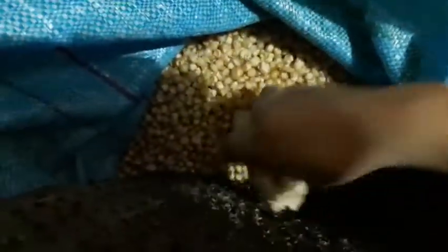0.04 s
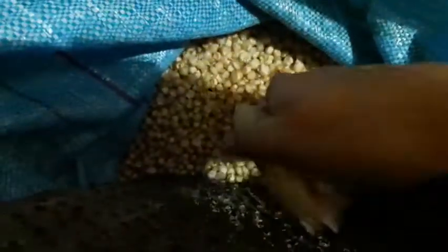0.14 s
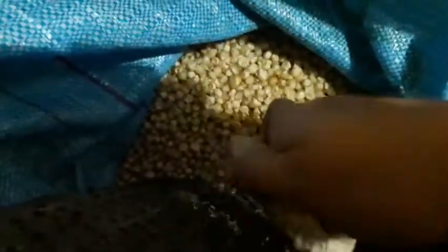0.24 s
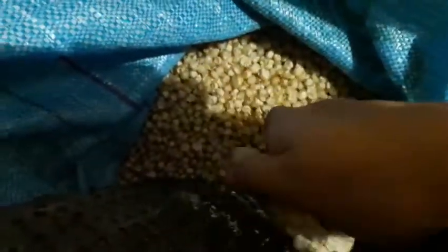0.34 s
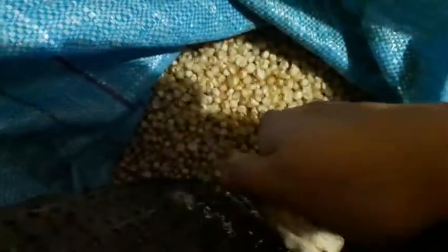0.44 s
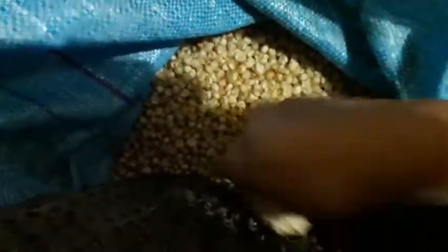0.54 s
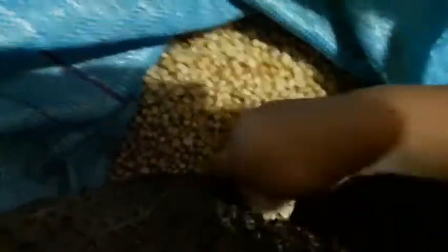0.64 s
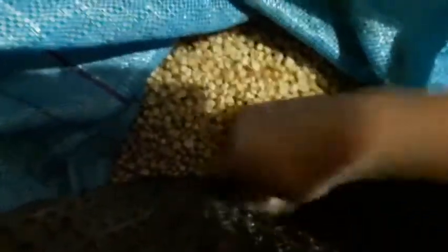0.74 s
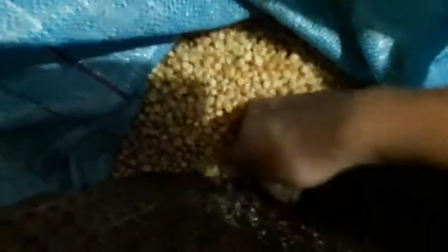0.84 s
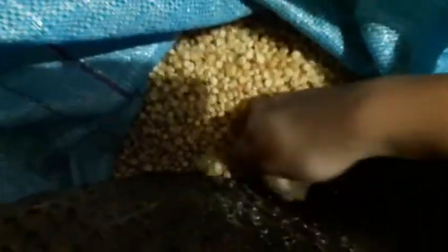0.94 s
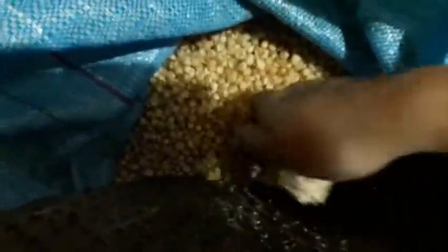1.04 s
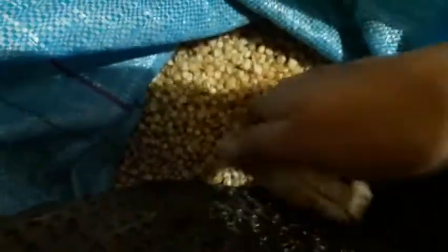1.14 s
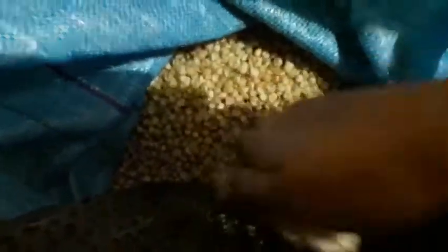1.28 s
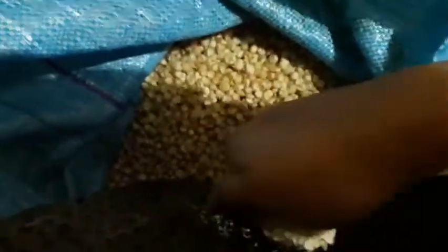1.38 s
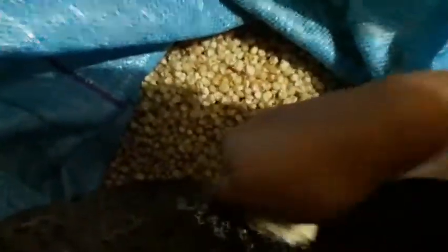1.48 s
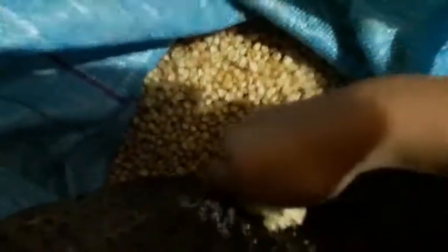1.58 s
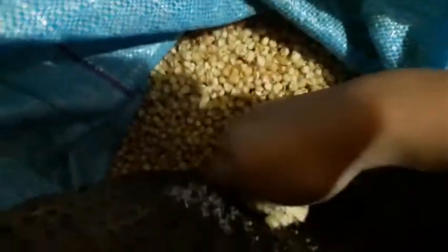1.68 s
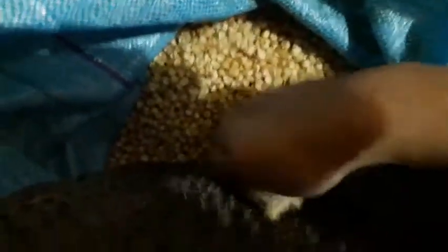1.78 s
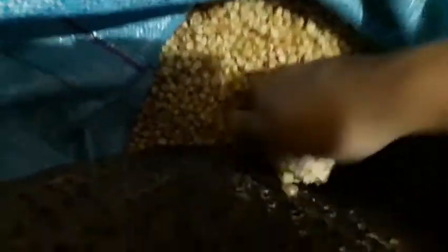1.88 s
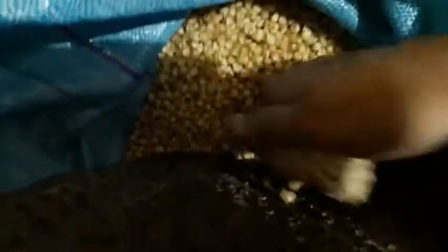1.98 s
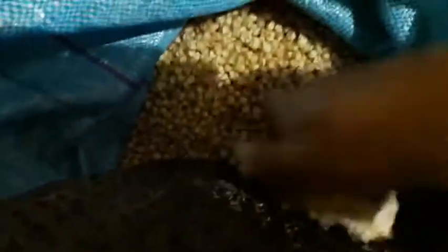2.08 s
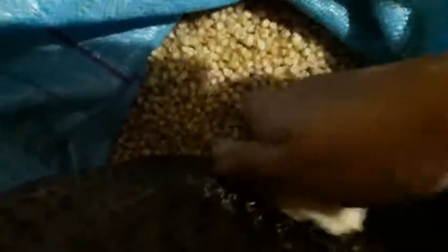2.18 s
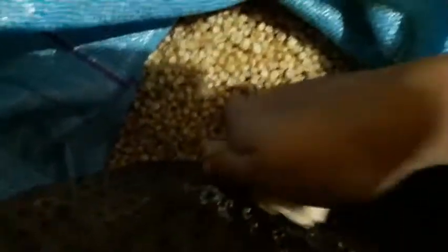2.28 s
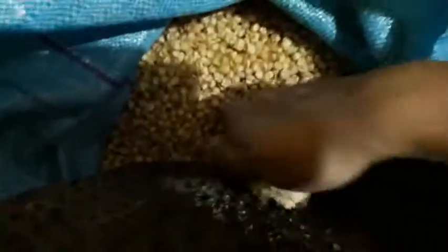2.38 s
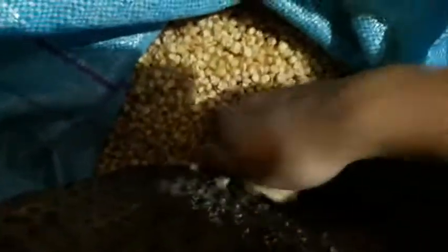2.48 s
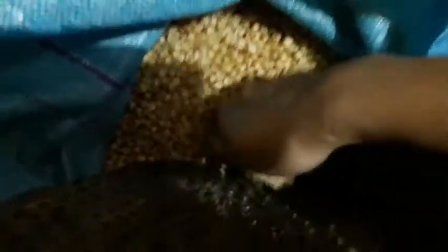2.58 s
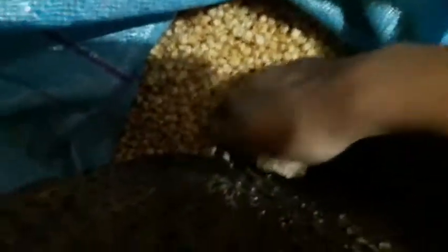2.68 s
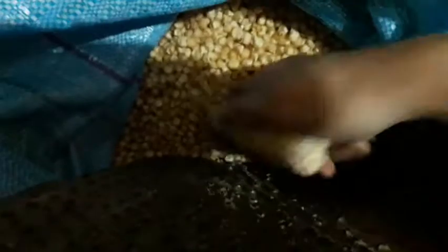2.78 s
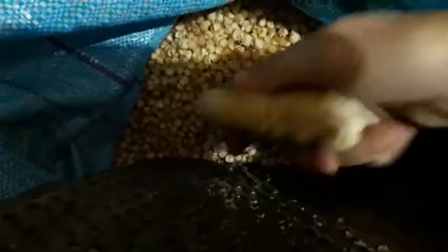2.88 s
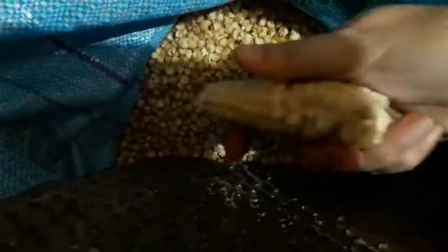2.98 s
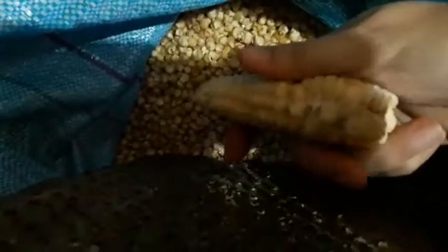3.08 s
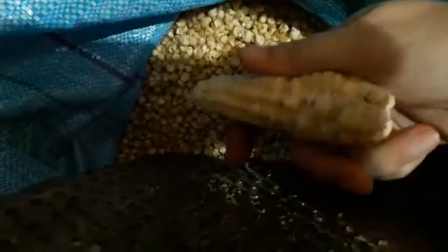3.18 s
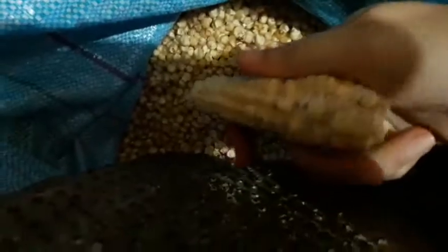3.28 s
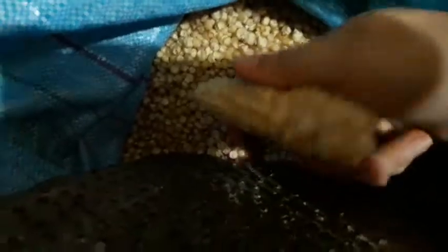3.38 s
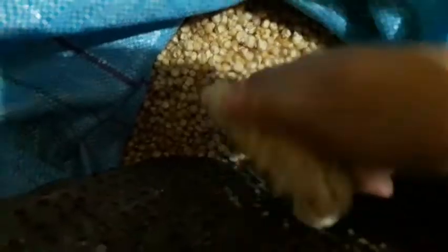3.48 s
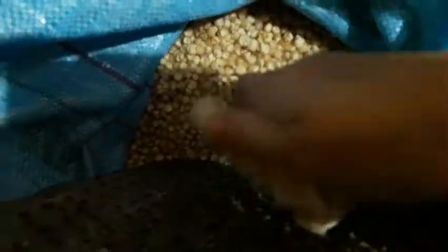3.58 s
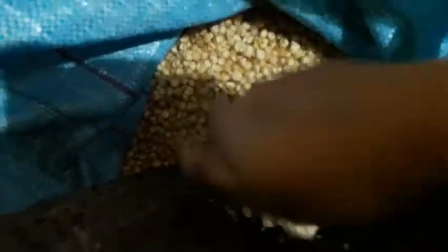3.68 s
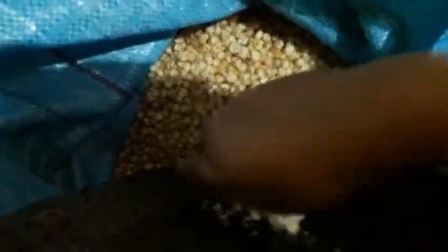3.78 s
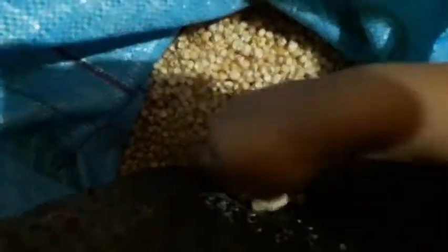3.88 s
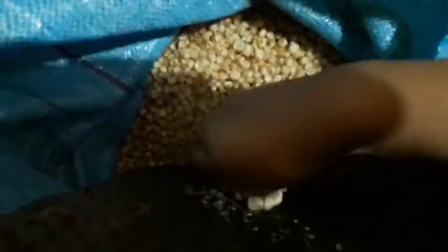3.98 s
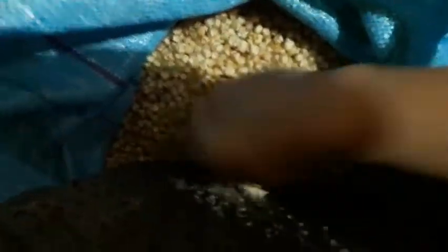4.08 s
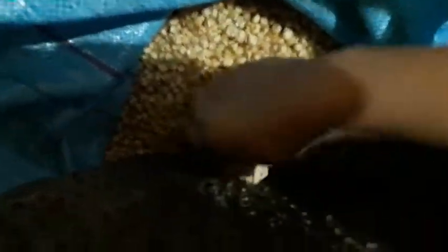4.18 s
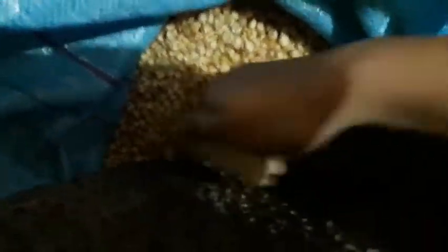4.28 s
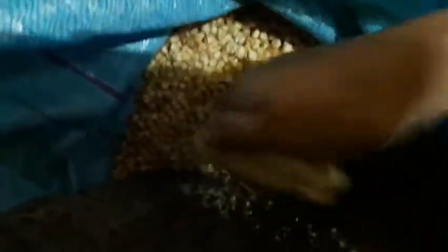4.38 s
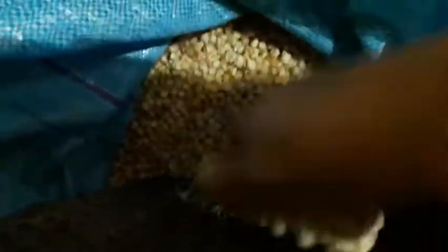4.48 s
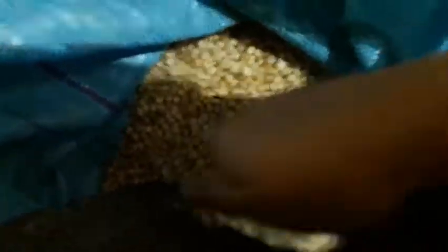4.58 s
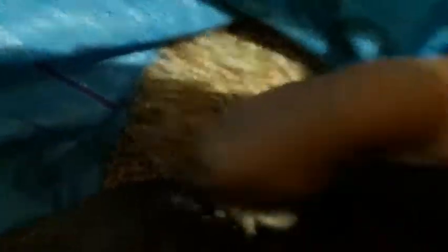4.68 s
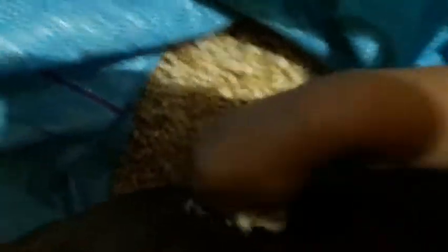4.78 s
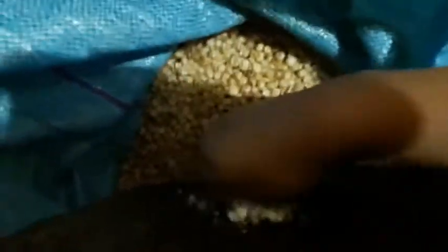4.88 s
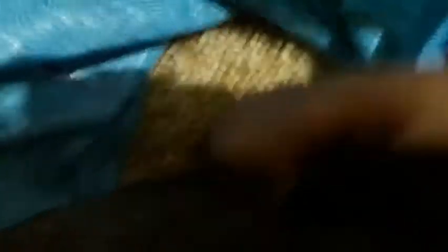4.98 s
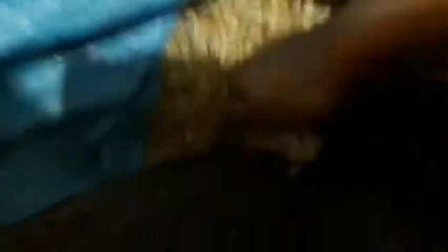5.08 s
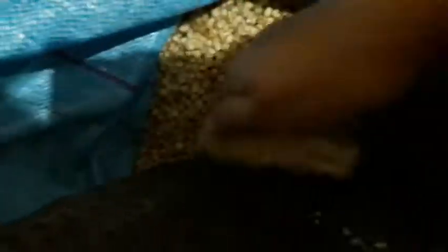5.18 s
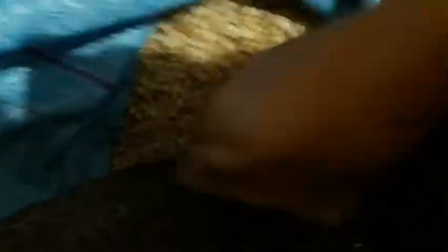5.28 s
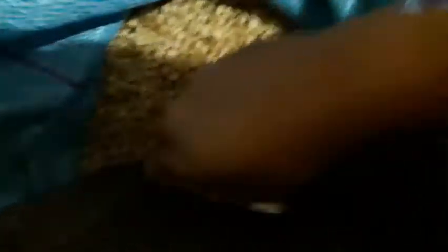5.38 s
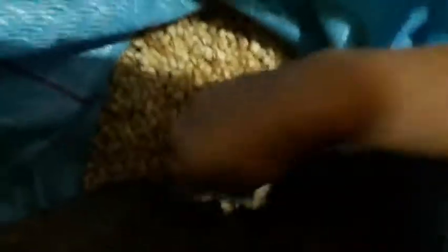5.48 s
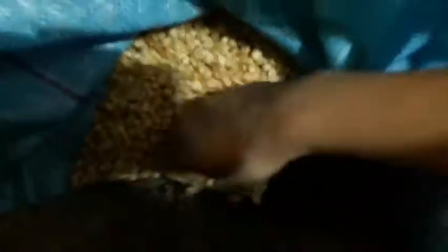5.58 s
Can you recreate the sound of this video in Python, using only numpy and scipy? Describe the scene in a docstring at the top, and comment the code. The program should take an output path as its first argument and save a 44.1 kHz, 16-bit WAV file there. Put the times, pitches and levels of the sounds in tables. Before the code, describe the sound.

Close-up crunchy twisting of a dried cob: sharp kernel clicks, gritty rubbing and soft woody thuds over faint hiss and hum.

```python
"""Kernels snap and click over a dense crackling rub, dull knocks, a brief room ring, faint hiss and hum.
Hands twist dry kernels off a cob close to a phone, above a heap of corn on a woven sheet.
Snaps are short noise bursts around a ring, knocks are damped sine swings, and the rub is swarms
of noise grains over a jolted cob rumble; decaying noise makes the small room, and coloured noise
with a low sine makes the background."""
import sys
import numpy as np
from scipy import signal
from scipy.fft import rfft, irfft
from scipy.io import wavfile

SR = 44100
rng = np.random.default_rng(int(sys.argv[2]) if len(sys.argv) > 2 else 0)


def to_wav(sig):
    """Store sig (one row per channel, or 1-D mono) as 16-bit WAV at the path in sys.argv[1].

    Samples outside -1..1 are clipped; the rate is SR.
    """
    pcm = np.clip(np.atleast_2d(sig), -1, 1) * 32767
    pcm = np.round(pcm).astype(np.int16)
    wavfile.write(sys.argv[1], SR, pcm.T)  # frames by channels


N = 248724  # length of the scene in samples

# tone colour of dry kernels, in snaps and crackle alike: (frequency [Hz], relative level [dB])
KERNEL_COLOUR = [(500, -17.5), (900, -18), (2000, -13), (2600, -15), (4000, -11.5), (7600, -10),
                 (8900, -20), (11900, -12.5), (15600, -18.5)]


def undb(db):
    """Gain of a level in dB."""
    return 10 ** (np.asarray(db) / 20)


def level(x, db):
    """Scale x to an rms of db."""
    return x * undb(db) / np.sqrt(np.mean(x ** 2))


def ring(x, hz, width_hz):
    """One resonance, gain 1 at its centre."""
    return signal.lfilter(*signal.iirpeak(hz, hz / width_hz, fs=SR), x)


def colour(x, points, size=2048):
    """Causal filter through (Hz, dB) points, from the folded cepstrum of the log gain."""
    hz, db = np.transpose(points)
    log_hz = np.log(np.fft.rfftfreq(size, 1 / SR) + 1)  # 1 Hz added so that 0 Hz has a logarithm
    gain = undb(np.interp(log_hz, np.log(hz), db))
    cepstrum = irfft(np.log(gain))
    # folding the second half onto the first leaves no sound ahead of its cause
    cepstrum[1:size // 2] *= 2
    cepstrum[size // 2 + 1:] = 0
    impulse = irfft(np.exp(rfft(cepstrum)))
    return signal.fftconvolve(x, impulse)[:len(x)]


def fade(t60_s, size):
    """Exponential decay that falls 60 dB in t60_s."""
    return np.exp(-np.log(1000) * np.arange(size) / SR / t60_s)


def add(out, x, start_s):
    """Mix x into out from start_s."""
    i = int(start_s * SR)
    out[i:i + len(x)] += x[:N - i]


def grains(per_s, spread_db):
    """Clicks at random times, many small and few large."""
    hit = rng.random(N) < per_s / SR
    size = np.minimum(rng.exponential(size=N), 3)
    return level(hit * undb(spread_db * size), 0)


def crackle():
    """Dull, bright and sizzling swarms of tiny noise bursts, each at its own moments, over steady noise."""
    out = undb(-2.5) * rng.standard_normal(N)
    for hz in (3500, 6500, 12000):
        swarm = signal.fftconvolve(grains(110, spread_db=4.5), fade(0.006, size=800))[:N]
        bursts = swarm * rng.standard_normal(N)
        out += level(ring(bursts, hz, 0.73 * hz), -6.5)
    return level(colour(out, KERNEL_COLOUR), 0)


def rub():
    """Stick and slip: grains crackle over a rustle and jolts shake the cob, swelling with each twist."""
    # background of hands and sheet: (time [s], rustle level [dB], cob rumble level [dB])
    background = [(0, -57.5, -52), (.4, -63, -50.5), (1.15, -61, -60.5), (1.65, -68.5, -57.5),
                  (2.0, -66.5, -55), (2.652, -55, -61), (3.001, -68.5, -64), (3.45, -87.5, -62),
                  (3.62, -71.5, -54), (4.4, -77, -64), (4.78, -49.5, -53), (5.2, -66, -63)]
    # twists of the grip: (middle [s], length [s], crackle level [dB])
    twists = [(0.018, 0.081, -52), (0.253, 0.015, -38.5), (0.539, 0.038, -23), (0.607, 0.031, -24.5),
              (0.767, 0.052, -24), (0.96, 0.1, -61), (1.223, 0.019, -37.5), (1.269, 0.016, -24),
              (1.416, 0.021, -27), (1.497, 0.047, -29.5), (1.77, 0.033, -26.5), (1.87, 0.041, -40.5),
              (2.097, 0.022, -38.5), (2.235, 0.044, -39.5), (2.331, 0.067, -39), (2.468, 0.077, -41),
              (2.595, 0.021, -38), (3.495, 0.0077, -44.5), (3.668, 0.013, -29.5), (3.791, 0.031, -23.5),
              (3.864, 0.025, -26.5), (4.085, 0.033, -32.5), (4.188, 0.063, -53.5), (4.513, 0.067, -52.5),
              (4.555, 0.015, -29.5), (4.611, 0.048, -28.5), (4.68, 0.026, -30.5), (4.892, 0.055, -32),
              (4.985, 0.069, -49.5), (5.311, 0.04, -40.5), (5.398, 0.068, -30.5), (5.483, 0.035, -53.5),
              (5.553, 0.033, -29)]
    # broad resonances of the cob: (frequency [Hz], width [Hz], relative level [dB])
    cob_resonances = [(149, 100, -1.5), (223, 201, 13), (445.6, 300, -18.5), (1400, 1100, -12)]
    onset_share = 0.87  # a twist swells faster than it dies away
    rumble_db, rumble_per_db = -5.5, 0.804  # rumble follows the crackle level, a little more evenly

    t = np.arange(N) / SR
    times_s, rustle_db, held_db = np.transpose(background)
    crackle_gain = undb(np.interp(t, times_s, rustle_db))
    held_gain = undb(np.interp(t, times_s, held_db))
    jolt_gain = np.zeros(N)
    for mid_s, length_s, crackle_db in twists:
        span_s = np.where(t < mid_s, onset_share * length_s, length_s)
        swell = np.exp(-(2 * (t - mid_s) / span_s) ** 2 / 2)
        crackle_gain += undb(crackle_db) * swell
        jolt_gain += undb(rumble_db + rumble_per_db * crackle_db) * swell

    # each slip pushes the cob for a moment; between twists the grip stirs it evenly
    slips = signal.fftconvolve(grains(140, spread_db=1.0), fade(0.039, size=2000))[:N]
    jolts = level(level(slips, 0) + undb(-7), 0)
    rumble = np.zeros(N)
    for hz, width_hz, db in cob_resonances:
        rumble += undb(db) * ring(rng.standard_normal(N), hz, width_hz)
    rumble = level(rumble, 0)
    return crackle_gain * crackle() + (jolt_gain * jolts + held_gain) * rumble


def air():
    """Distant hiss of coloured noise with a low sine hum."""
    # tone colour of the hiss: (frequency [Hz], relative level [dB])
    hiss_colour = [(25, 4.5), (55, 10.5), (400, -2.5), (640, 3), (1200, -6.5), (2200, -8), (2750, -32.5),
                   (3600, -16), (4000, -1.5), (4500, -15.5), (6300, -15.5), (6850, -1), (7600, -24),
                   (9000, -32.5), (15600, -34)]
    # steady hum: (frequency [Hz], rms level [dB])
    hum_tones = [(177, -72.5)]
    t = np.arange(N) / SR
    hiss = level(colour(rng.standard_normal(N), hiss_colour, size=8192), -65.5)
    hum = sum(level(np.sin(2 * np.pi * hz * t), db) for hz, db in hum_tones)
    return hiss + hum


def room(x):
    """Quick nearby echoes and a longer, duller tail, both decaying noise."""
    size = SR // 2
    near, far = rng.standard_normal((2, size))
    echoes = undb(-38) * near * fade(0.15, size)
    far_tail = undb(-53) * ring(far, 2700, 5300) * fade(0.61, size)
    # the walls give back little bass
    response = signal.lfilter(*signal.butter(1, 300, "high", fs=SR), echoes + far_tail)
    return signal.fftconvolve(x, response)[:N]


def snaps():
    """Each kernel cracks in a short noisy burst around a ring of its own; chaff sizzles on top."""
    # kernels that snap off or land: (time [s], level [dB])
    kernel_hits = [(0.023, -30.5), (0.16, -38), (0.469, -26.5), (0.505, -16), (0.535, -7.5), (0.561, -34),
                   (0.592, -12.5), (0.6174, -12), (0.728, -22), (0.745, -5.5), (0.757, -5.5),
                   (0.781, -12.5), (0.8773, -31.5), (0.9156, -26.5), (0.9385, -19), (1.1898, -12),
                   (1.2215, -36), (1.2546, -24), (1.2649, -8.5), (1.275, -33), (1.3986, -20), (1.4176, -35),
                   (1.457, -25), (1.486, -14), (1.5185, -7), (1.711, -27.5), (1.753, -18.5), (1.7669, -7.5),
                   (1.8438, -20), (1.905, -18), (1.9221, -19.5), (1.979, -17.5), (2.0583, -19),
                   (2.072, -26), (2.137, -24), (2.154, -22.5), (2.1725, -19.5), (2.2045, -12),
                   (2.262, -19.5), (2.272, -25), (2.2798, -21.5), (2.299, -20), (2.3055, -20.5),
                   (2.3436, -22), (2.367, -25), (2.4056, -15), (2.4482, -19), (2.4834, -5), (2.5476, -21),
                   (2.5798, -7), (2.598, -21.5), (2.6978, -26), (2.66, -33), (2.761, -29), (2.861, -39),
                   (3.488, -31.5), (3.576, -46), (3.6639, -47), (3.7803, -3.5), (3.7934, -6.5),
                   (3.8494, -4.5), (3.966, -22), (3.866, -20.5), (3.991, -43), (4.0373, -24),
                   (4.0608, -11.5), (4.0763, -7), (4.1834, -25), (4.2146, -17.5), (4.451, -24),
                   (4.5028, -21.5), (4.5505, -6.5), (4.5668, -9.5), (4.581, -17), (4.5978, -17),
                   (4.6311, -13), (4.649, -5.5), (4.6781, -10), (4.724, -23.5), (4.772, -30), (4.787, -37),
                   (4.808, -20), (4.86, -8.5), (4.872, -13), (4.8946, -4.5), (4.9072, -5), (5.073, -24),
                   (5.1117, -21), (5.1532, -17.5), (5.2641, -14), (5.2985, -21), (5.3493, -10.5),
                   (5.3756, -8.5), (5.4234, -11), (5.5326, -10.5), (5.5502, -6.5), (5.588, -13.5)]
    # sizzle above the crack as the grip shifts along the cob: (time [s], level [dB])
    sizzle_levels = [(0.45, 1.5), (0.55, -11.5), (0.9, -2.5), (1.3, -16.5), (1.75, -7.5), (2.0, -19.5),
                     (2.2, -11), (2.5, -8.5), (2.75, -16), (3.55, -6.5), (4.2, -14.5), (4.9, -10),
                     (5.3, -14), (5.6, -9)]
    body_per_db = 0.37  # light ticks are thinner: less broad crack around their ring
    size = 2000
    out, t = np.zeros(N), np.arange(size) / SR
    low = signal.butter(4, 9000, "low", fs=SR, output="sos")
    high = signal.butter(4, 9000, "high", fs=SR, output="sos")
    chance = rng.standard_normal((len(kernel_hits), size + 2))
    for (start_s, db), (pitch, span, *noise) in zip(kernel_hits, chance):
        # hard cracks last longer than light ticks
        t60_s = 0.027 * undb(0.052 * db + 2.4 * np.tanh(span))
        attack = np.minimum(t / 0.0019, 1)
        envelope = attack * (fade(t60_s, size) + undb(-16.5) * fade(1.5 * t60_s, size))
        envelope += undb(-4.0) * fade(0.00086, size)  # the first sharp tick

        grit = colour(np.array(noise), KERNEL_COLOUR)
        body = level(signal.sosfilt(low, grit), -8.5 + body_per_db * db)
        ring_hz = 5300 * 1.438 ** np.tanh(pitch)
        kernel_ring = level(ring(grit, ring_hz, 1500), -9.0)
        sizzle_db = np.interp(start_s, *np.transpose(sizzle_levels))
        sizzle = level(signal.sosfilt(high, grit), sizzle_db)
        add(out, undb(db) * envelope * (body + kernel_ring + sizzle), start_s)
    return out


def knocks():
    """Soft flesh pushes the damped cob: it swings up and dies within a few cycles, never twice alike."""
    # knocks of the cob in the grip: (time of widest swing [s], level [dB], pitch [Hz])
    cob_knocks = [(0.534, -8, 286), (0.55, -20.5, 216), (0.618, -17, 305), (0.734, -19.5, 297),
                  (0.759, -10.5, 310), (0.785, -23, 340), (0.803, -19.5, 352), (0.951, -38, 300),
                  (1.196, -25.5, 330), (1.417, -11.5, 324), (1.519, -13, 274), (1.76, -21.5, 480),
                  (1.856, -31, 292), (2.093, -28, 300), (2.208, -28, 400), (2.287, -28.5, 266),
                  (2.485, -19.5, 236), (2.491, -34, 87), (2.588, -22, 287), (3.501, -33, 250),
                  (3.675, -29, 334), (3.798, -18, 335), (3.851, -22.5, 424), (4.081, -18, 510),
                  (4.098, -15.5, 310), (4.221, -28.5, 316), (4.457, -31, 278), (4.531, -20, 320),
                  (4.688, -17.5, 294), (4.855, -20, 237), (4.875, -14, 300), (4.893, -21.5, 267),
                  (4.978, -25, 286), (5.008, -28, 306), (5.271, -22.5, 254), (5.367, -27.5, 413),
                  (5.43, -25.5, 435), (5.501, -30.5, 280), (5.556, -23.5, 240)]
    out, t = np.zeros(N), np.arange(2000) / SR
    chance = rng.random((len(cob_knocks), 2))
    for (peak_s, db, hz), (phase, upper) in zip(cob_knocks, chance):
        upper_hz = (1.533 + 0.45 * upper) * hz
        swing = np.sin(2 * np.pi * (hz * t + phase))
        swing += undb(-7.5) * np.sin(2 * np.pi * upper_hz * t)
        rise_s = 0.79 / hz  # 0.79 of a cycle
        envelope = t / rise_s * np.exp(1 - t / rise_s)
        add(out, undb(db) * swing * envelope, peak_s - rise_s)
    return out


def scene():
    """One microphone hears hands, room and air, alike in both channels."""
    hands = snaps() + knocks() + rub()
    return np.tile(hands + room(hands) + air(), (2, 1))


def record(dry):
    """The phone cuts the bass, rounds the loudest peaks and cuts the top in two steep steps."""
    out = signal.sosfilt(signal.butter(2, 60, "high", fs=SR, output="sos"), dry)
    out = np.tanh(1.1 * out) / 1.1
    out = signal.sosfilt(signal.ellip(6, 0.3, 30, 15850, fs=SR, output="sos"), out)
    return signal.sosfilt(signal.ellip(10, 0.2, 70, 16979, fs=SR, output="sos"), out)


dry = scene()
out = record(dry)
to_wav(out)
```